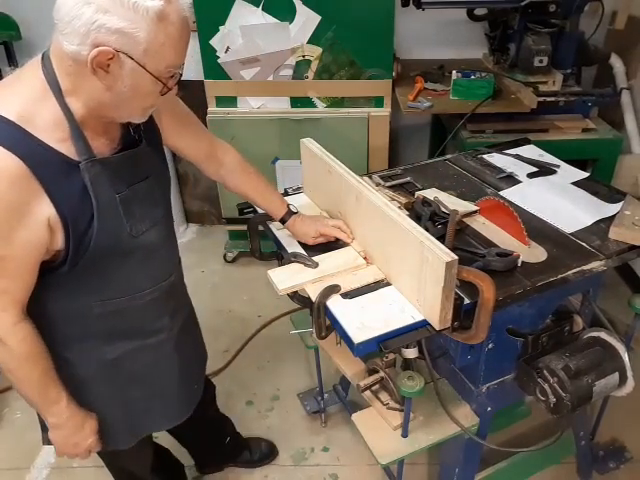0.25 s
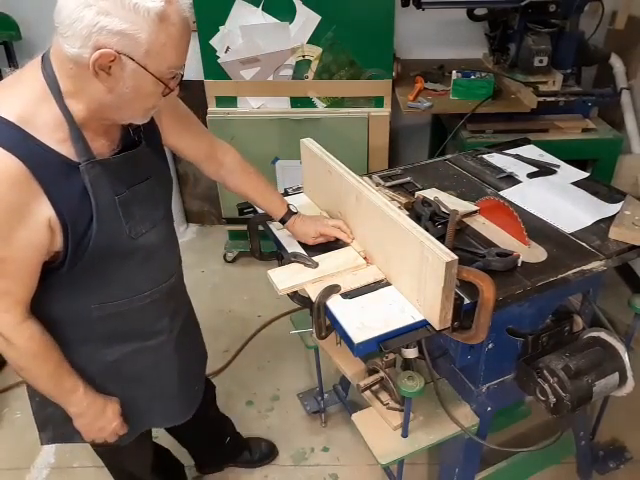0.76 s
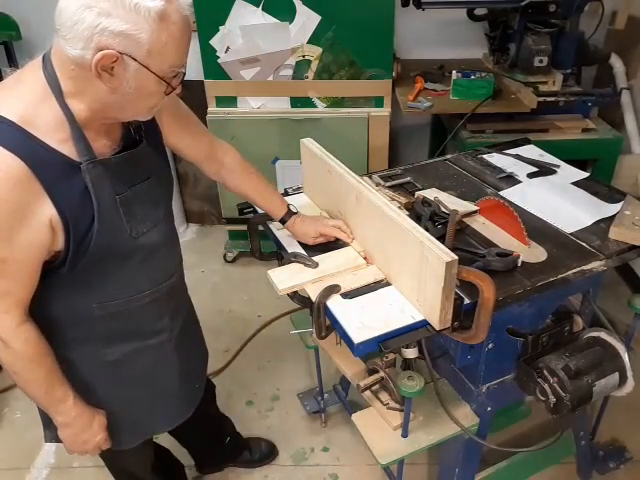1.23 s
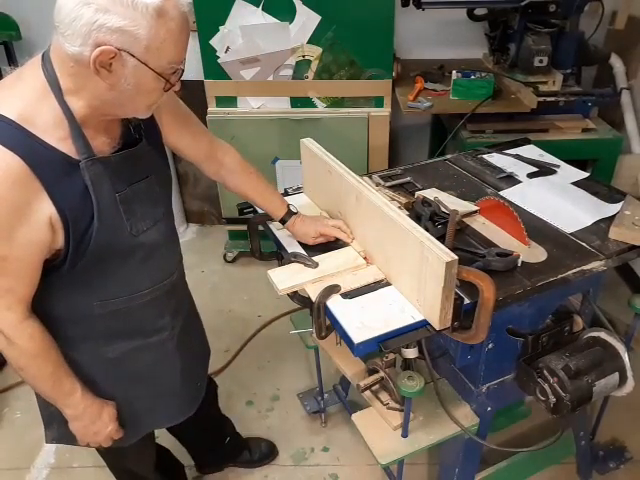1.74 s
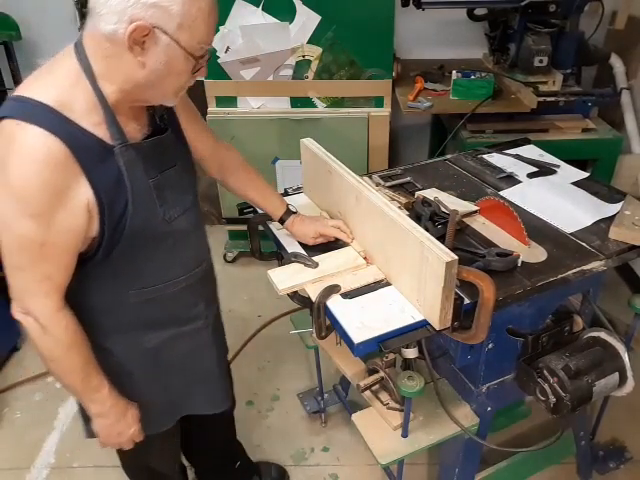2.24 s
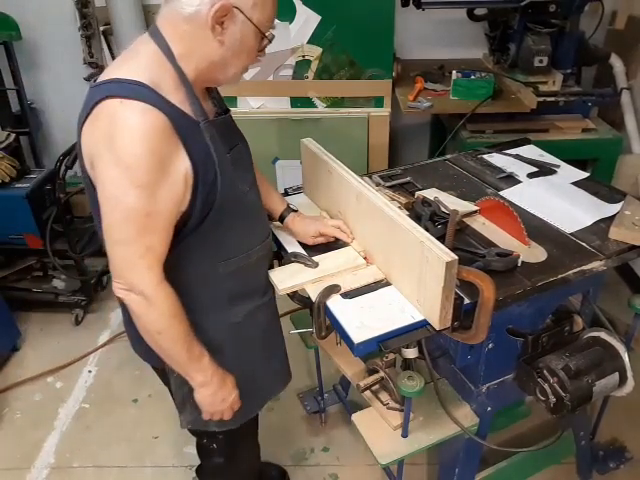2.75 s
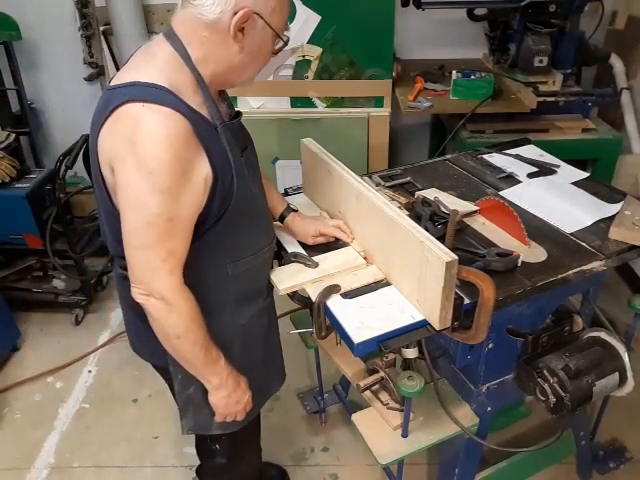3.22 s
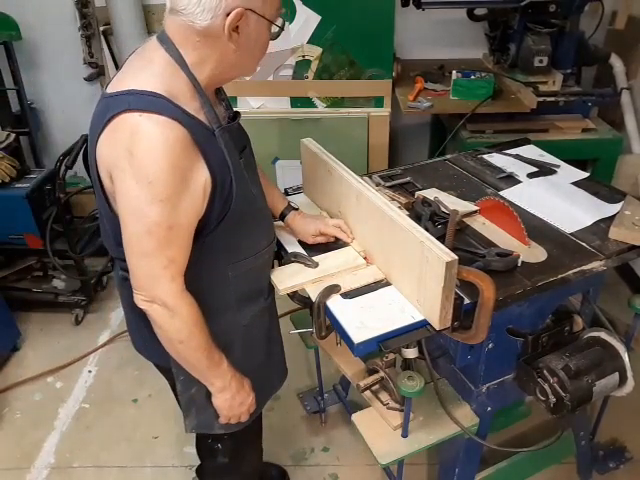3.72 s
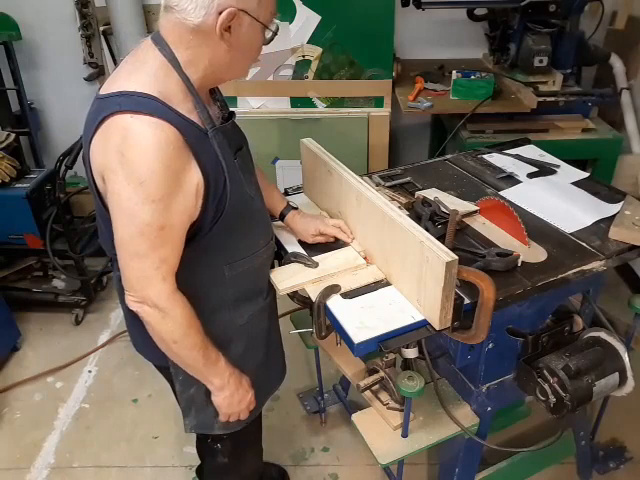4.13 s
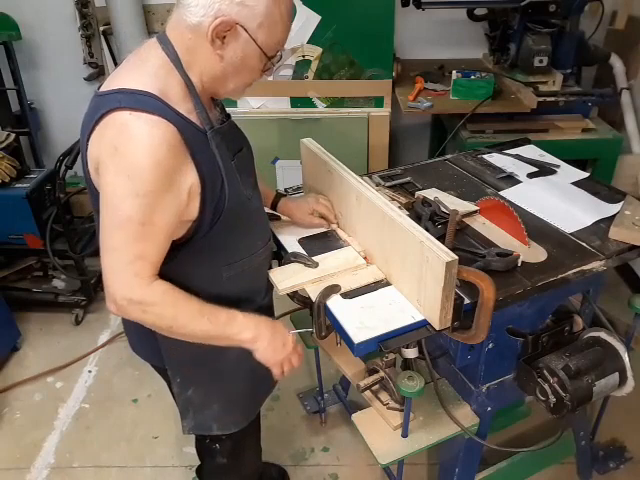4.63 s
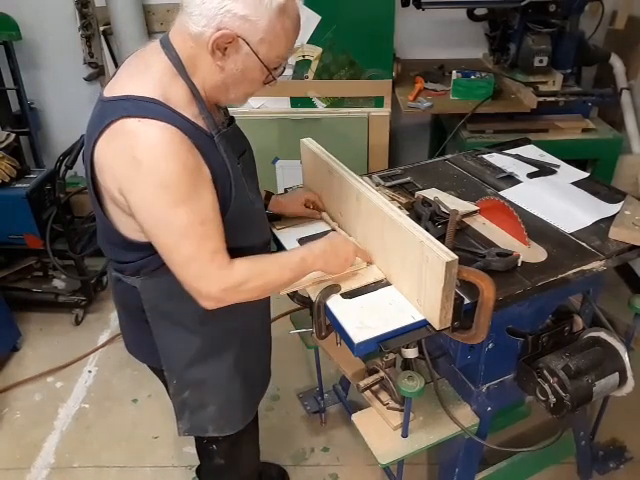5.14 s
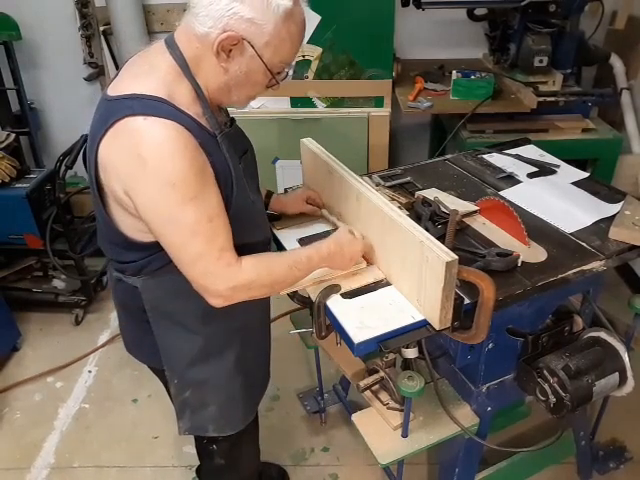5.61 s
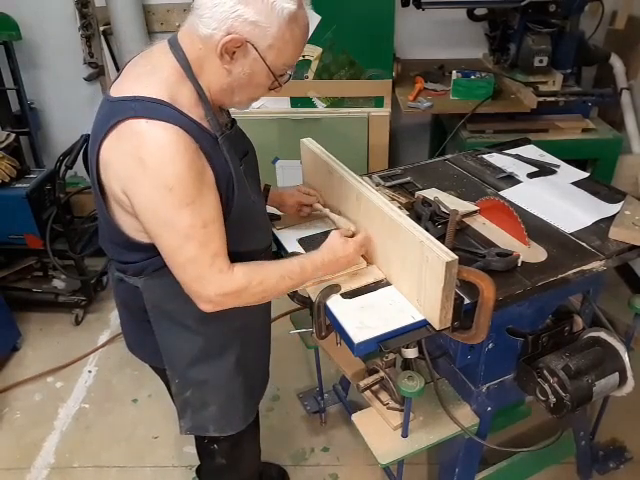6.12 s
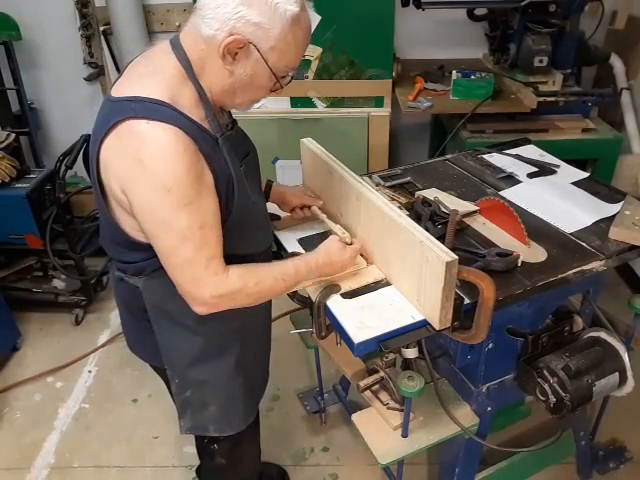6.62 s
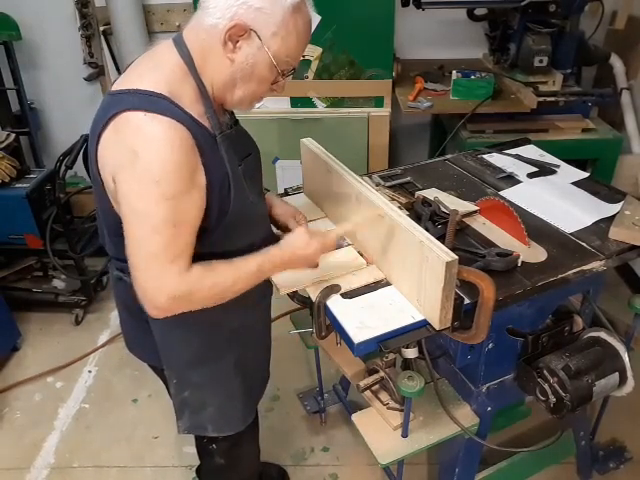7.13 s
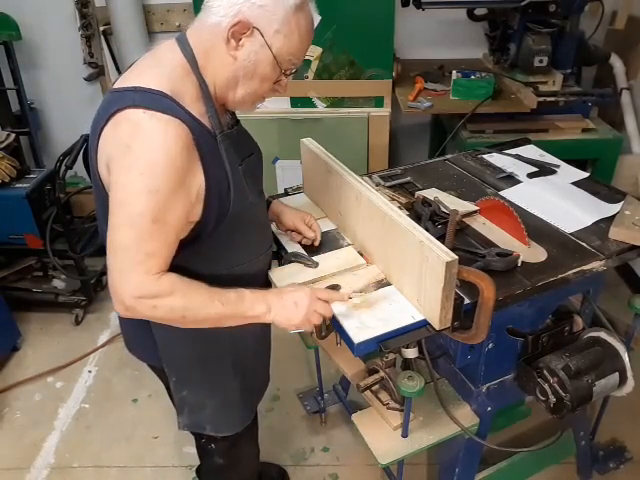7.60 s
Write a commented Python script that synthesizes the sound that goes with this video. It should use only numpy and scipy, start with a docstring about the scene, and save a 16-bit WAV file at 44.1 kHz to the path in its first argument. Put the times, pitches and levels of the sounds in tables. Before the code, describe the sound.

In a small workshop, a router coasts down, its whine steadily falling with a rattle and brush hiss. At about two and a half seconds the level suddenly jumps, with dull bumps. The hiss turns grainy and cuts off near four seconds. Over a faint distant piston throb, wood is softly knocked, slid and ticked by fingers, then three loud raps end it. Stereo pickup, short room reverb.

```python
"""A table router, switched off, coasts to a stop in a small workshop: its whine sinks, a loose part rattles
and the carbon brushes hiss, all driven by one slowing shaft. Midway the volume is turned up and the router
is heard much louder; the sound of a distant piston machine comes in, low tones at multiples of its stroke
rate, and dull bumps follow. The rotor stands; hands shift a piece of wood: soft knocks, grainy noise, ticks.
Near the end come three hard raps of wood on the table, the first with a weaker rebound: cracks and ringing."""
import sys
import numpy as np
from scipy import signal
from scipy.fft import rfft, irfft, next_fast_len
from scipy.io import wavfile
from scipy.ndimage import map_coordinates

SR = 44100
rng = np.random.default_rng(int(sys.argv[2]) if len(sys.argv) > 2 else 0)


def waveform_to_disk(signal):
    """Save audio, clipped to [-1, 1], as 16-bit WAV at the path in sys.argv[1]."""
    frames = np.transpose(np.atleast_2d(signal))
    scaled = np.clip(frames, -1, 1) * 32767
    samples = np.round(scaled).astype(np.int16)
    wavfile.write(sys.argv[1], SR, samples)


N = 346626
TIME = np.arange(N) / SR

# The space. Likeness of left and right: (frequency [Hz], likeness [0 to 1])
LEFT_RIGHT_LIKENESS = [(60, .92), (250, 0.53), (1000, 0.32), (2500, 0.19), (8000, 0.042)]
# how long the workshop rings: (frequency [Hz], time to fall 60 dB [s])
ROOM_RING = [(100, 0.31), (250, 0.42), (500, .34), (1000, 0.29), (3000, 0.29), (12000, 0.24)]
# colour of the quiet background air: (frequency [Hz], relative level per Hz [dB])
AIR_COLOUR = [(350, -32), (600, -3), (634, -12), (996, -5), (1210, -5.5), (1440, -6.5), (5900, -10.5),
              (15800, -9.5)]
TOP_HZ = 15850  # nothing is left above this

# Distant piston machine: (time [s], strokes per second [Hz])
PUMP_RATE = [(3, 22), (3.8, 15.6), (4.3, 22), (5, 19.3), (5.5, 20.1), (6, 20.4), (6.6, 23), (7.9, 19)]
# its low thud: (multiple of the stroke rate, relative level [dB])
THUD_TONES = [(3, -5.5), (4, 1.5), (5, 0), (6, -10), (7, -15.5)]
# its higher tones: (multiple of the stroke rate, relative level [dB])
PUMP_OVERTONES = [(8, -10), (9, 0), (10, -7.5), (13, -18), (16, -5.5), (18, -6.5), (19, -8.5), (20, -13.5),
                  (22, -14.5)]
# colour of its drone, also used for the fan's draught: (frequency [Hz], relative level per Hz [dB])
DRONE_COLOUR = [(15, -48), (25, -24.5), (102, -4), (259, -21.5), (297, -21.5), (361, -30), (472, -23),
                (509, -28), (565, -32), (900, -40.5), (1170, -65.5), (1980, -120)]
PUMP_COME_IN_S = 0.22  # time constant with which its sound comes in
THUD_DB, THUD_DB_PER_S = -73, 1.92  # level when the volume is turned up, steady rise after that
OVERTONE_DB, OVERTONE_DB_PER_S = -92, 5
DRONE_DB = -65

# Dull bumps: (time [s], level [dB], centre frequency [Hz])
DULL_BUMPS = [(2.538, -46.5, 200), (2.564, -41, 227), (2.57, -40, 434), (2.611, -51, 300)]
# Wood sliding under the hand: (start [s], length [s], level [dB], tilt [dB per octave])
SLIDES = [(4.433, .06, -77, 1), (4.62, 0.037, -80, -9), (4.75, 0.043, -79, -1), (4.946, 0.42, -76.5, -0.5),
          (5.565, 0.079, -65, -7.5), (5.693, .14, -65.5, -1.5), (5.84, .1, -67.5, -2),
          (6.171, 0.064, -68, -8), (6.925, .07, -67, 3.5), (7.021, 0.048, -58.5, 4),
          (7.076, 0.077, -67.5, -3)]
# small dry ticks of fingers on wood: (time [s], relative level [dB])
FINGER_TICKS = [(4.4383, -62), (4.628, -64.5), (4.7594, -65), (5.5977, -56.5), (5.9354, -73), (6.1645, -60),
                (6.2022, -52.5), (7.0209, -60)]
# colour of slides and ticks: (frequency [Hz], relative level per Hz [dB])
SCUFF_COLOUR = [(1060, -42), (1800, -24), (2300, -14), (2610, -21), (3160, -11.5), (3530, -14), (4720, -1),
                (5120, -5), (7300, -3), (8670, -19), (9410, -7.5), (10500, -15), (14600, -5.5), (15800, -8)]
SLIDE_ATTACK_S, SLIDE_RELEASE_S = 0.014, 0.031  # linear rise, time constant of the fall

# Wood on the table: (time [s], level [dB], brightness corner [Hz], left over right [dB])
WOOD_KNOCKS = [(4.133, -60.5, 697, -3), (4.157, -59.5, 520, -5), (4.195, -61.5, 500, -3),
               (4.44, -76, 2000, -2), (4.775, -77, 500, -1), (5.225, -78.5, 1300, -12),
               (5.546, -68, 500, -3), (5.575, -60.5, 450, -4), (5.605, -63, 1290, -7),
               (7.347, -24.5, 1450, -2.5), (7.399, -35, 1110, -7), (7.534, -19.5, 3110, -2),
               (7.7249, -19.5, 4970, -3)]
# ringing tones of the wood: (frequency [Hz], relative level [dB], time to fall 60 dB [s])
WOOD_TONES = [(272, -21.5, 0.97), (333, -19, 0.57), (435.4, -13, 0.15), (480.5, -8, 0.34), (564, -8, 0.22),
              (585, 1, 0.26), (677, -0.5, 0.24), (828, -3.5, 0.2), (917, 2, 0.14), (1011, 6.5, 0.081),
              (1213, 9.5, 0.079), (1356, -34, 0.13), (1474, 1, 0.19), (1770, -10, 0.3), (2016, -9, 0.24),
              (2164, 3, 0.18), (2474, -16.5, 0.48), (2910, -5.5, 0.2)]
# colour of the crack: (frequency [Hz], relative level per Hz [dB])
CRACK_COLOUR = [(100, -34.5), (250, -20), (420, -16), (560, -2.5), (740, -12.5), (1250, -4), (1650, -11.5),
                (2100, -5.5), (2950, -13.5), (3500, -19.5), (4250, -24), (4650, -15.5), (6200, -17),
                (7300, -19), (8000, -29), (15800, -31.5)]

# Router whine, shaft harmonics and ball bearings between them: (multiple of the speed, relative level [dB])
WHINE_TONES = [(3, 0), (3.4, -15), (4, -4), (5, -1.5), (6, 1.5), (7, 2), (8, 1), (9, -3), (9.78, 4.5),
               (10, -3), (11, -7.5), (12, -7), (13, -4), (15, -5), (16, -4)]
# colour the motor housing gives the whine: (frequency [Hz], gain [dB])
HOUSING_COLOUR = [(100, -28), (450, -8), (560, 12), (660, -7), (800, 3.5), (910, 3.5), (1020, 2.5),
                  (1150, -1), (1380, 2), (1520, 5.5), (1780, -2), (2030, 1), (2230, -9), (2380, -1.5),
                  (2550, -3), (2900, -2), (3100, -9), (5000, -5)]
# colour of the brush hiss: (frequency [Hz], relative level per Hz [dB])
BRUSH_COLOUR = [(700, -38.5), (820, -12), (930, -34), (1400, -23.5), (2500, -22), (3400, -19.5),
                (4200, -13.5), (5300, -10), (6100, 1), (6600, 4.5), (7300, 0), (7800, -5.5), (9000, 0),
                (11000, -0.5), (12200, -5), (14700, -2), (15800, -7)]
# colour of the bearing rumble: (frequency [Hz], relative level per Hz [dB])
BEARING_COLOUR = [(90, -51.5), (150, -21), (360, -3), (540, -7), (660, -13), (815, 4), (890, -17.5),
                  (1000, 2.5), (1110, -7), (1370, 0), (1550, -4.5), (1950, -2), (2600, -5), (3300, -10.5),
                  (5000, -10.5), (6500, -29), (11000, -91.5)]
# colour of the rattle: (frequency [Hz], relative level per Hz [dB])
RATTLE_COLOUR = [(2500, -30), (3300, -10), (3650, 4.5), (4100, -7.5), (4500, 1.5), (6200, -1), (6900, -8.5),
                 (7700, -27.5)]
# strength of the rattle: (speed [turns per s], relative level [dB])
RATTLE_BY_SPEED = [(60, -67.5), (125, -60), (185, -56), (212, -48.5), (255, -54), (277, -52), (303, -56)]
# resonances of the router table: (frequency [Hz], half width [Hz], relative level [dB])
TABLE_RESONANCES = [(175, 9, -69), (205, 6, -56.5), (222, 6, -56), (238, 4, -51.5), (254, 5.5, -51),
                    (273.5, 4, -48.5), (295, 7.5, -40.5), (350, 16, -46.5), (380, 7, -44.5),
                    (401, 7, -41.5), (425, 7, -45.5), (458, 16, -47.5), (520, 16, -48), (562, 14, -39.5)]

START_HZ = 303.3  # shaft speed at the start, turns per second
# even braking by dry friction; share of the speed that air drag takes each second
FRICTION_HZ_PER_S, DRAG_PER_S = 70.3, .0197
STOP_S, STOP_DB_PER_S = 3.914, 596.5  # the brushes grip: the rotor's last sounds fall from here
VOLUME_UP_AT_S, VOLUME_UP_DB = 2.445, 20  # router levels below are as heard before the volume is turned up
HUM_DB, SECOND_ORDER_DB = -0.5, -6.5  # over the table's levels; twice-a-turn shake against once-a-turn
RUMBLE_DB, RUMBLE_KNEE_HZ, RUMBLE_FAST_DB = -60.5, 45, 6  # base, fades below the knee, extra at full speed
BRUSH_DB, DRAG_IN_DB = -51.5, 4.5  # base level, extra hiss on a slow commutator
DRAG_IN_HZ, DRAG_IN_WIDTH_HZ = 82, 17  # speed around which that extra hiss comes in
WHINE_DB, WHINE_POWER = -45, 2.05  # level at full speed; amplitude goes as speed to this power
WALL_S, WALL_SHARE = .0119, .35  # delay and strength of the whine's echo from a wall


def amp(db):
    """Turn decibels into an amplitude factor."""
    return 10 ** (np.asarray(db) / 20)


def unit(x):
    """Scale to an average (rms) strength of 1."""
    return x / np.sqrt(np.mean(x ** 2) + 1e-20)


def along(points, hz):
    """Read a table of (frequency, value) points on a log frequency axis."""
    f, v = np.transpose(points)
    return np.interp(np.log(hz + 1), np.log(f + 1), v)


def wobble(rate):
    """A smooth random curve with this many random points a second."""
    points = rng.standard_normal(int(N * rate / SR) + 4)
    return map_coordinates(points, [np.arange(N) * rate / SR])


def filtered(x, response):
    """Reshape a sound by a response that depends on frequency."""
    n = x.shape[-1]
    m = next_fast_len(n + 8192)
    return irfft(rfft(x, m) * response(np.fft.rfftfreq(m, 1 / SR)), m)[..., :n]


def causal(x, gain, size=4096):
    """Filter with minimum phase, so that no sound comes early and attacks stay sharp."""
    log_gain = np.log(np.maximum(gain(np.fft.rfftfreq(size, 1 / SR)), 1e-6))
    fold = np.r_[1, np.full(size // 2 - 1, 2), 1, np.zeros(size // 2 - 1)]
    impulse = irfft(np.exp(rfft(irfft(log_gain) * fold)))
    return signal.fftconvolve(x, impulse[None], axes=1)[:, :x.shape[1]]


def diffuse(n):
    """Stereo noise: alike in the bass, nearly unrelated in the treble, reaching the left side first."""
    def mid_side_gain(hz):
        turn = np.arccos(np.clip(along(LEFT_RIGHT_LIKENESS, hz), -1, 1)) / 2
        return np.array([np.cos(turn), np.sin(turn)])
    mid, side = filtered(rng.standard_normal((2, n)), mid_side_gain)
    return np.array([mid + side, np.roll(mid - side, 7)])


def rush(colour):
    """Steady coloured stereo noise of rms 1."""
    return unit(filtered(diffuse(N), lambda hz: amp(along(colour, hz))))


def pan(db):
    """Left and right gains that differ by this many dB."""
    return amp([[db / 2], [-db / 2]])


def add(track, s, sound):
    """Mix a sound in at time s."""
    part = track[:, round(s * SR):][:, :sound.shape[1]]
    part += sound[:, :part.shape[1]]


def room(wet_db, echo_db):
    """Direct path, dull echoes from bench and ceiling, and a fresh spread-out tail; energy 1."""
    hz, t, z = signal.stft(diffuse(SR // 2), SR, nperseg=256)
    fading = z * amp(-60 * t / along(ROOM_RING, hz)[:, None])
    tail = signal.istft(fading, SR, nperseg=256)[1][:, :SR // 2]
    h = amp(wet_db) * tail / np.linalg.norm(tail[0])
    h[0, 0] += 1
    h[1, 7] += 1  # the right side hears it 7 samples later
    dull = np.hanning(9)[None] / 2
    add(h, .0045, amp(echo_db) * dull)
    add(h, .0195, amp(echo_db - 4) * dull)
    return h / np.sqrt(np.sum(h ** 2) / 2)


def in_room(x, wet_db):
    """A running sound as it arrives through the workshop."""
    return signal.fftconvolve(np.atleast_2d(x), room(wet_db, echo_db=-13.5), axes=1)[:, :N]


def air():
    """The quiet, steady noise of the background air."""
    return amp(-74.5) * rush(AIR_COLOUR)


def pump():
    """Distant piston machine: tones locked to the strokes over a drone; thud and overtones get steadily louder."""
    rate = np.interp(TIME, *np.transpose(PUMP_RATE))
    angle = 2 * np.pi * np.cumsum(rate) / SR
    age = np.maximum(TIME - VOLUME_UP_AT_S, 0)
    thud = unit(sum(amp(db) * np.sin(k * angle) for k, db in THUD_TONES))
    # the level sways over two strokes, and also at random
    thud = thud * amp(1.06 * np.sin(angle / 2) + wobble(11))
    ring = np.zeros(N)
    for k, db in PUMP_OVERTONES:
        level = amp(db + 2.5 * wobble(8))
        ring += level * np.sin(k * angle + rng.normal(0, 1) + .07 * k * wobble(21))
    sound = amp(THUD_DB + THUD_DB_PER_S * age) * thud
    sound = sound + amp(OVERTONE_DB + OVERTONE_DB_PER_S * age) * unit(ring)
    sound = sound + amp(DRONE_DB) * rush(DRONE_COLOUR)
    return sound * (1 - np.exp(-age / PUMP_COME_IN_S)) * pan(-.8)


def bumps(t60=0.15):
    """Soft heavy contacts: only a short low boom of fading noise."""
    out, t = np.zeros((2, N)), np.arange(SR // 2) / SR
    for s, db, centre_hz in DULL_BUMPS:
        burst = diffuse(len(t)) * amp(-60 * t / t60)
        boom = causal(burst, lambda hz: 1 / (1 + 3 * np.log((hz + 1) / centre_hz) ** 2) ** 2)
        add(out, s, amp(db) * boom / np.std(boom[:, :SR // 20]))
    return out


def handling(pivot_hz=6000):
    """Wood under the fingers: slides are shaped noise, ticks are single clicks in the room."""
    out, t = np.zeros((2, N)), np.arange(SR) / SR
    for s, length, db, tilt_db in SLIDES:
        def colour(hz):
            octaves = np.log2(np.maximum(hz, SCUFF_COLOUR[0][0]) / pivot_hz)
            return amp(along(SCUFF_COLOUR, hz) + tilt_db * octaves)
        scuff = unit(filtered(diffuse(SR), colour))
        press = np.minimum(t / SLIDE_ATTACK_S, 1) * np.exp(-np.maximum(t - length, 0) / SLIDE_RELEASE_S)
        grain = amp(db + 1.3 * wobble(60)[:SR])
        add(out, s, grain * press * scuff)
    for s, db in FINGER_TICKS:
        tick = causal(room(wet_db=15, echo_db=-3.5), lambda hz: amp(along(SCUFF_COLOUR, hz)))
        add(out, s, amp(db - 10.0) * tick / np.std(tick[:, :SR // 20]))
    return out


def knocks():
    """A crack and the wood's ring; a softer contact loses the treble."""
    out, t = np.zeros((2, N)), np.arange(SR // 2) / SR
    for s, db, bright_hz, side_db in WOOD_KNOCKS:
        crack = causal(room(wet_db=13, echo_db=-1.5), lambda hz: amp(along(CRACK_COLOUR, hz)))
        ring = np.zeros((2, len(t)))
        for hz, level, t60 in WOOD_TONES:
            fade = amp(level + rng.normal(0, 0.66) - 60 * t / t60)
            phase = rng.uniform(0, 2 * np.pi) + rng.normal(0, 0.35, (2, 1))  # differs a little left and right
            ring += fade * np.sin(2 * np.pi * hz * t + phase)
        blow = unit(crack) + amp(-6.5) * unit(ring * (1 - np.exp(-t / 0.011)))
        # only a firm blow keeps a sharp edge above the brightness corner
        edge = amp(-12 + 2.07 * (db + 24.5))
        blow = causal(blow, lambda hz: np.sqrt(edge ** 2 + 1 / (1 + (hz / bright_hz) ** 6)))
        strength = np.std(blow[:, :SR // 20], axis=1, keepdims=True)
        add(out, s, amp(db) * pan(side_db) * blow / strength)
    return out


def shaft_speed():
    """Turns per second: dry friction brakes evenly, air drag a little more while the rotor is fast."""
    offset = FRICTION_HZ_PER_S / DRAG_PER_S
    speed = (START_HZ + offset) * np.exp(-DRAG_PER_S * TIME) - offset
    return np.maximum(speed, 1)  # kept above zero for the formulas that divide by it


def turning():
    """Gain that shuts off the rotor's sounds as it comes to rest."""
    return amp(-STOP_DB_PER_S * np.clip(TIME - STOP_S, 0, .5))


def draught(speed):
    """The cooling fan's low draught fades steeply with the speed."""
    return amp(-76.0) * (speed / START_HZ) ** 7 * rush(DRONE_COLOUR)


def hum(speed, angle):
    """Unbalance shakes the table once and twice a turn; it swells and dips on its way through the resonances."""
    def table(f):
        return sum(amp(db) / (1 + ((f - hz) / width) ** 4) for hz, width, db in TABLE_RESONANCES)
    fast = speed / START_HZ
    once = table(speed) * np.sin(angle)
    twice = amp(SECOND_ORDER_DB) * np.sqrt(fast) * table(2 * speed) * np.sin(2 * angle)
    return np.sqrt(2) * amp(HUM_DB) * fast ** 2 * (once + twice) * pan(-2.1)


def bearings(speed, angle):
    """Rolling rumble, made grainy by balls that bump over a flaw 3.4 times a turn on average."""
    passes = np.diff(np.floor(3.4 * angle / (2 * np.pi) + .15 * wobble(200)), prepend=0)
    clicks = in_room(passes * amp(5 * wobble(300)), wet_db=6)
    grain = causal(clicks, lambda hz: amp(along(BEARING_COLOUR, hz)))
    grain = grain / np.std(grain[:, 2 * SR:3 * SR])
    # the bumps stand out once the shaft is slow; at speed only the rush is left
    fast = speed / START_HZ
    rolling = .9 * rush(BEARING_COLOUR) + .95 * (1 - fast) ** 2 * grain
    level = amp(RUMBLE_DB + RUMBLE_FAST_DB * fast ** 2) / np.sqrt(1 + (RUMBLE_KNEE_HZ / speed) ** 4)
    sway = amp(1.5 * np.sin(angle) + .8 * wobble(12))
    return level * turning() * sway * rolling * pan(-1.5)


def brushes(speed, angle):
    """Hiss of the brushes, which press harder once a turn and drag more on a slow commutator."""
    slow = .5 + .5 * np.tanh((DRAG_IN_HZ - speed) / DRAG_IN_WIDTH_HZ)
    level = amp(BRUSH_DB + DRAG_IN_DB * slow + 4.6 * np.sin(angle) + 1.3 * wobble(20))
    return in_room(level * rush(BRUSH_COLOUR) * turning(), wet_db=9.0) * pan(1.0)


def rattle(speed, angle):
    """A loose part strikes once a turn, nearly alike each time, with a strength set by the speed."""
    turns = (angle + .02 * wobble(150)) / (2 * np.pi)
    strikes = np.diff(np.floor(turns), prepend=0) * amp(2.2 * wobble(120) + 1.2 * wobble(18))
    ring = filtered(strikes, lambda hz: amp(along(RATTLE_COLOUR, hz)))
    level = amp(np.interp(speed, *np.transpose(RATTLE_BY_SPEED)))
    clatter = level * ring / np.std(ring[:2 * SR])
    return in_room(clatter * turning(), wet_db=4.5) * pan(.5)


def whine(speed, angle):
    """Tones at multiples of the speed, blurred by play in the bearings, beat with their echo from a wall."""
    shaky = angle + .018 * wobble(70)
    tone = np.zeros(N)
    for k, db in WHINE_TONES:
        level = amp(db + 2.2 * wobble(12) + 1.8 * wobble(45))
        tone += level * np.sin(k * shaky + rng.uniform(0, 2 * np.pi))

    def housing_and_wall(hz):
        return amp(along(HOUSING_COLOUR, hz)) * (1 + WALL_SHARE * np.exp(-2j * np.pi * hz * WALL_S))
    tone = filtered(tone, housing_and_wall)
    level = amp(WHINE_DB) * (speed / START_HZ) ** WHINE_POWER * turning()
    return in_room(level * tone / np.std(tone[:2 * SR]), wet_db=1.5) * pan(-1.8)


def router():
    """Every part follows the one shaft as it coasts to rest; midway the volume is turned up."""
    speed = shaft_speed()
    angle = 2 * np.pi * np.cumsum(speed) / SR
    sound = draught(speed) + hum(speed, angle) + bearings(speed, angle)
    sound = sound + brushes(speed, angle) + rattle(speed, angle) + whine(speed, angle)
    return sound * amp(VOLUME_UP_DB * (TIME >= VOLUME_UP_AT_S))


def scene():
    """All layers, from the background to the router."""
    return air() + pump() + bumps() + handling() + knocks() + router()


def record(dry):
    """A steep cut removes what lies above the band limit."""
    return filtered(dry, lambda hz: 1 / np.sqrt(1 + (hz / TOP_HZ) ** 300))


dry = scene()
out = record(dry)
waveform_to_disk(out)
```